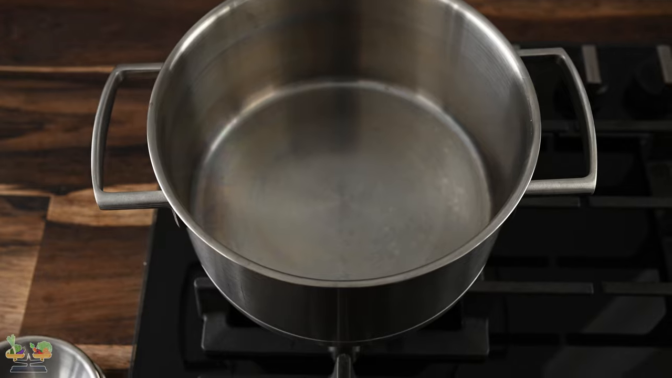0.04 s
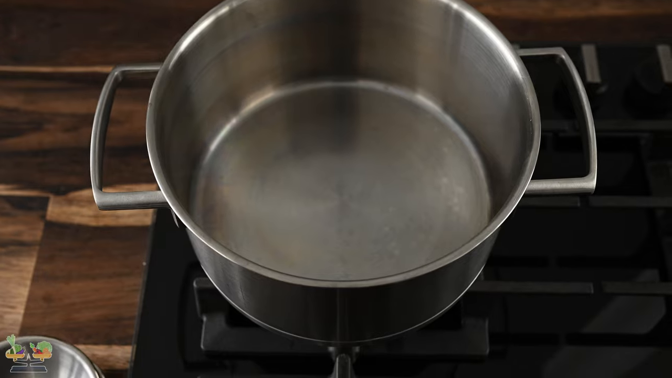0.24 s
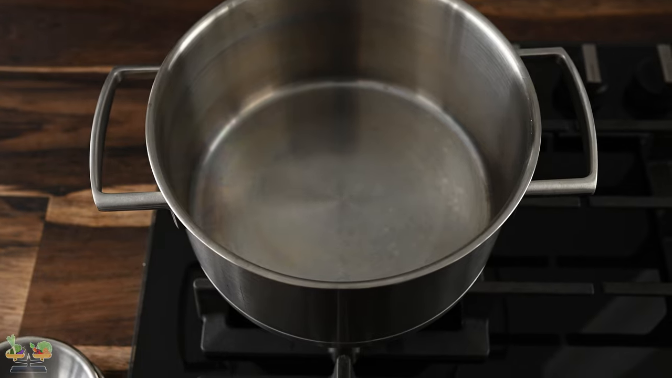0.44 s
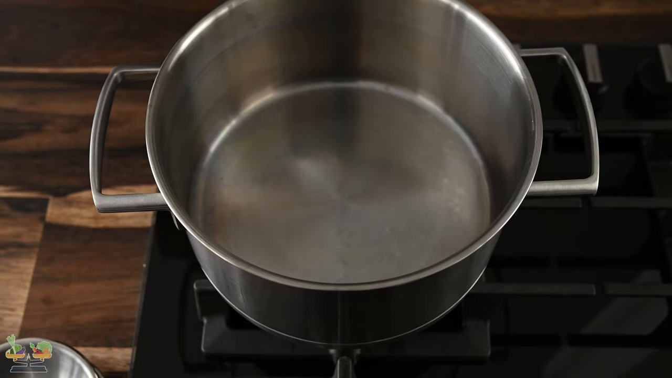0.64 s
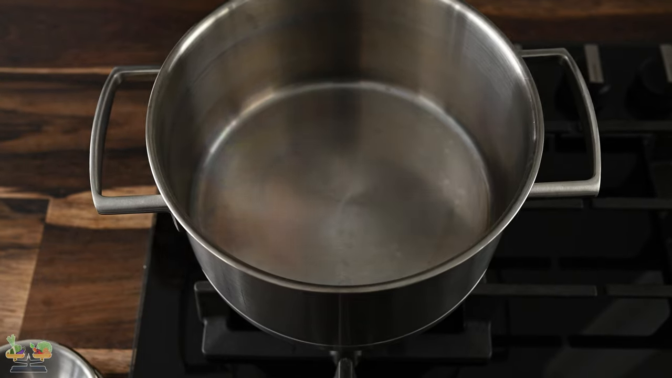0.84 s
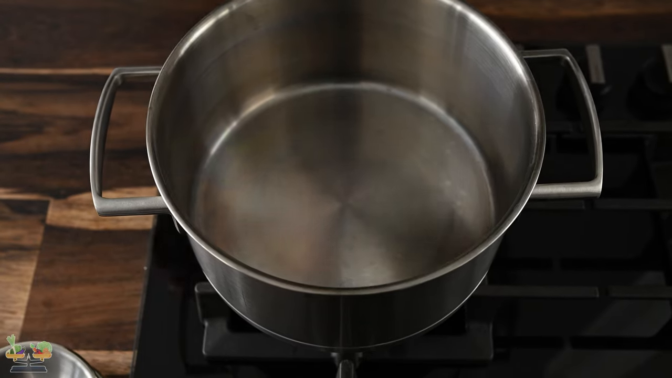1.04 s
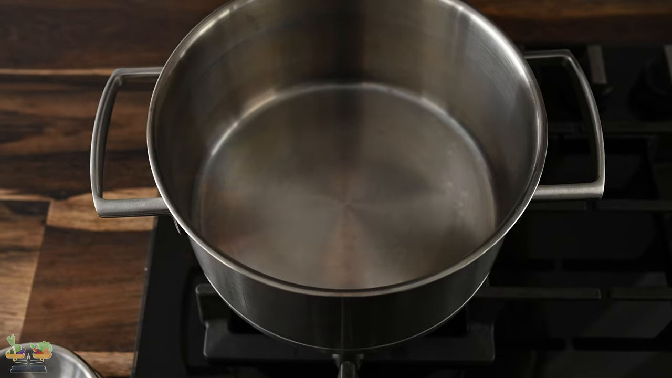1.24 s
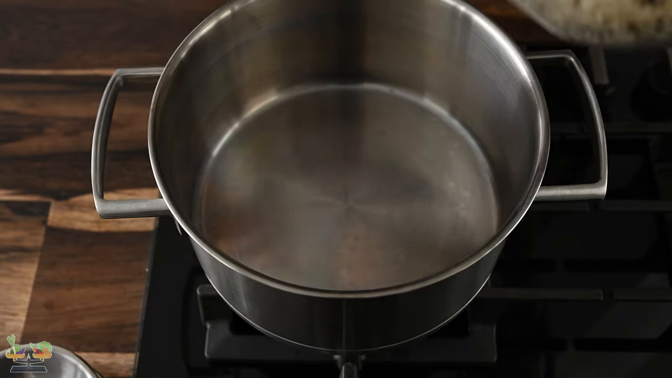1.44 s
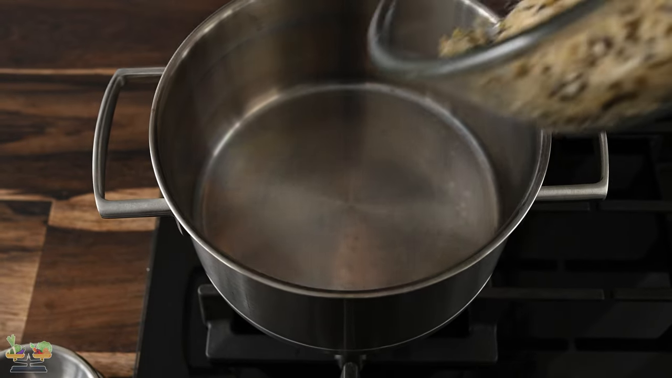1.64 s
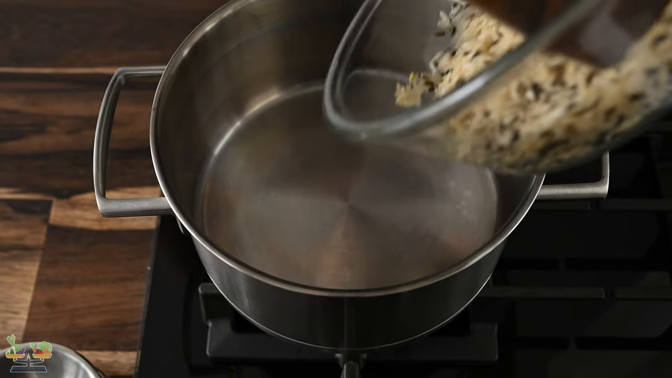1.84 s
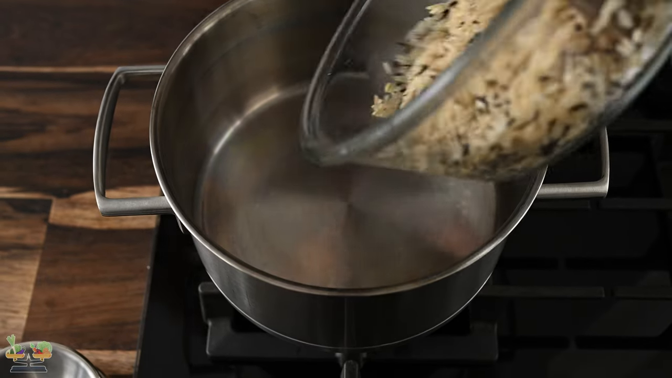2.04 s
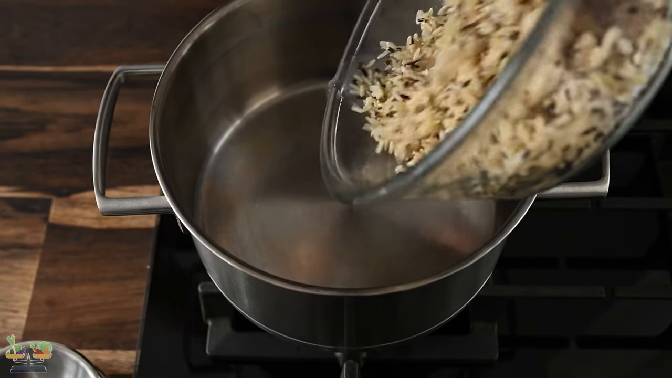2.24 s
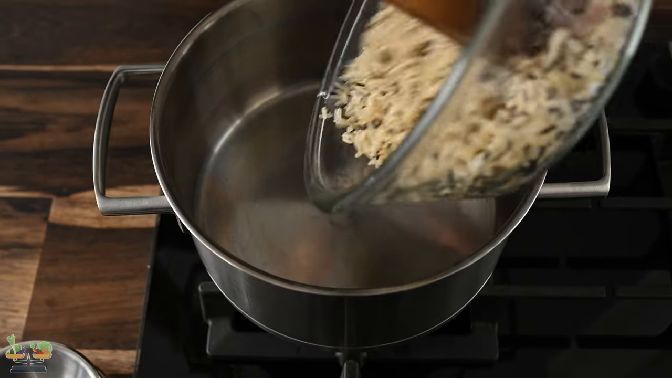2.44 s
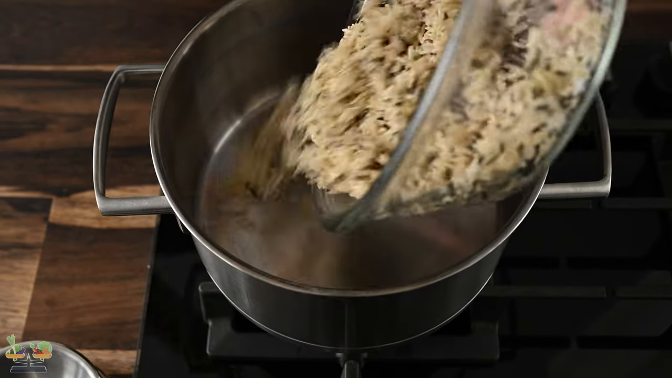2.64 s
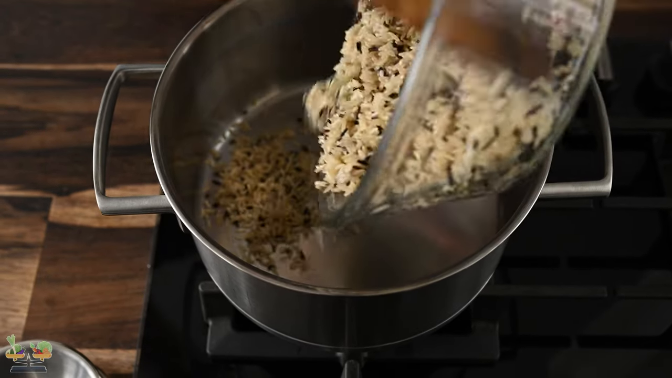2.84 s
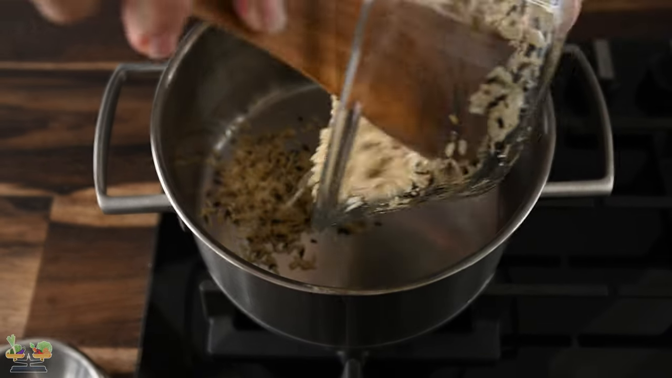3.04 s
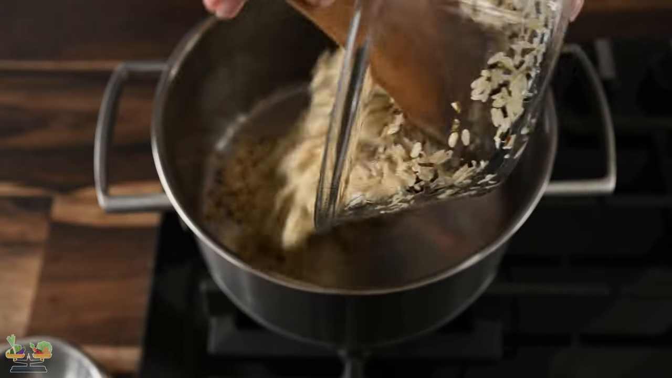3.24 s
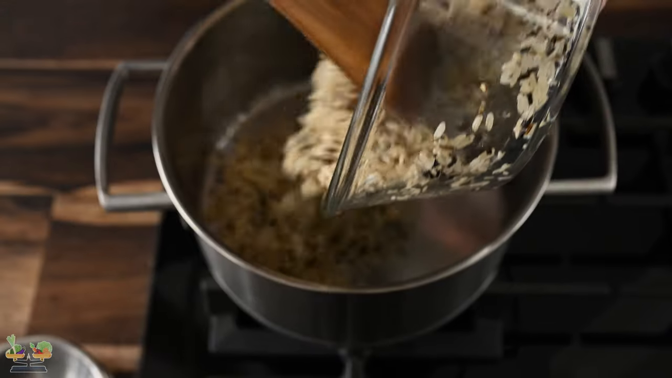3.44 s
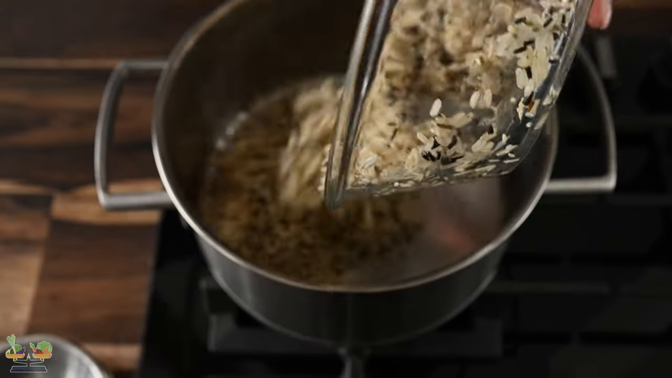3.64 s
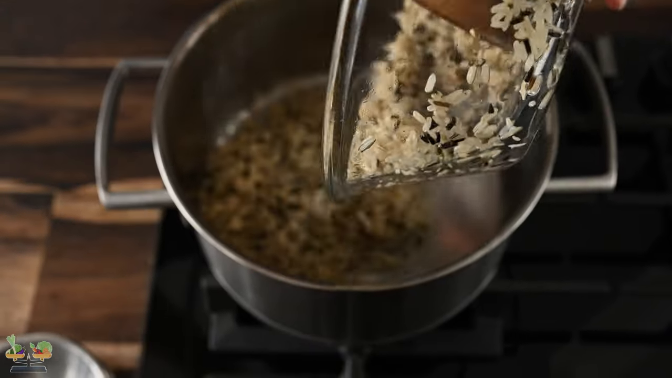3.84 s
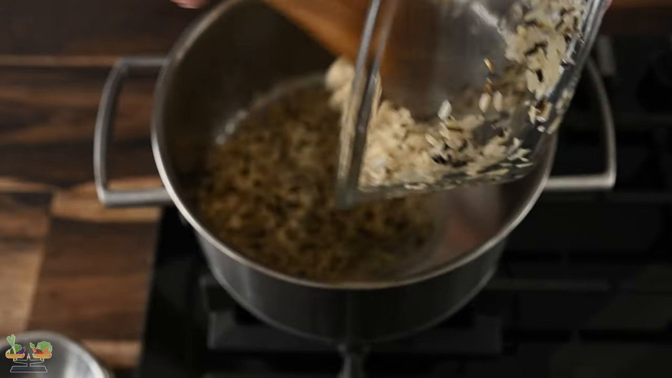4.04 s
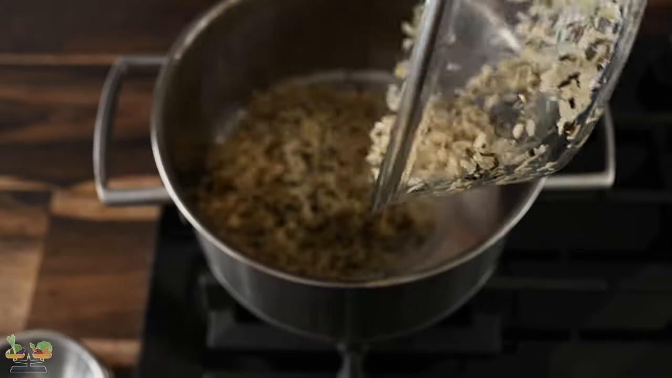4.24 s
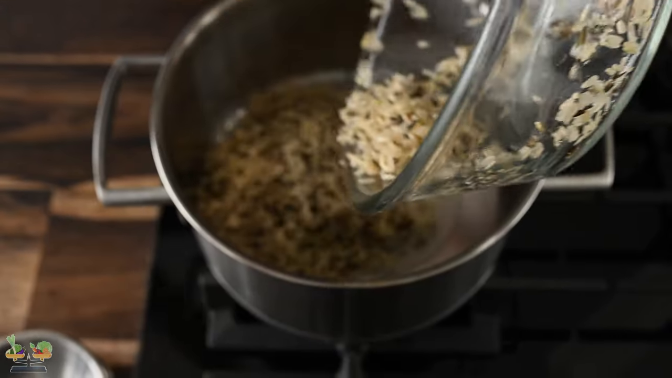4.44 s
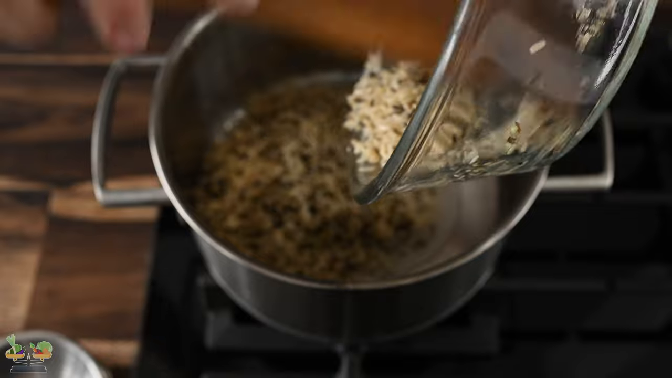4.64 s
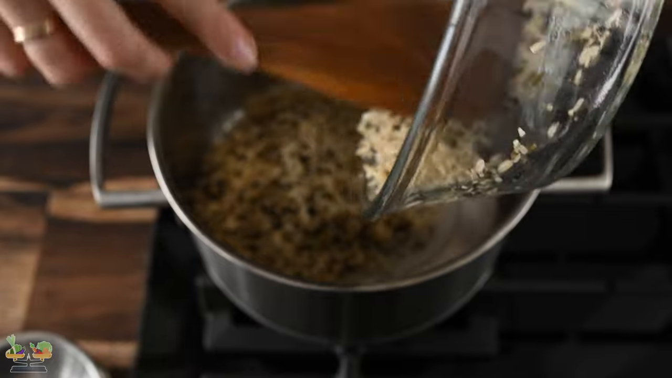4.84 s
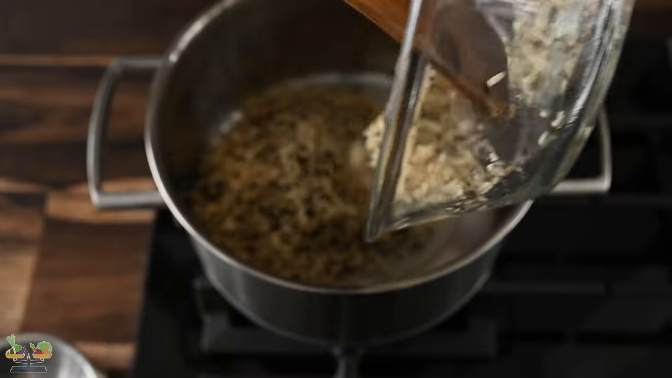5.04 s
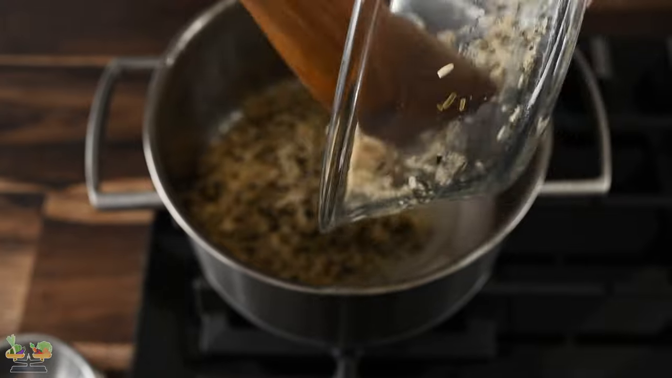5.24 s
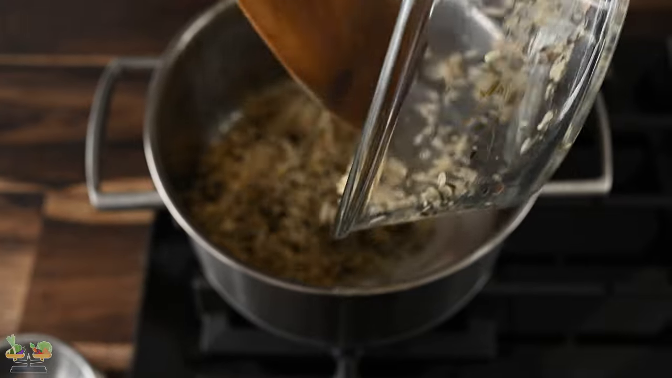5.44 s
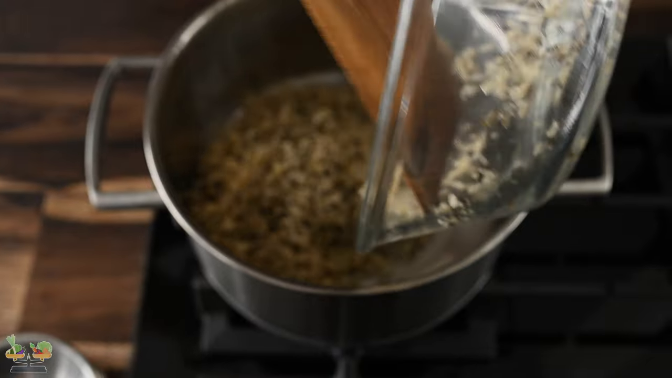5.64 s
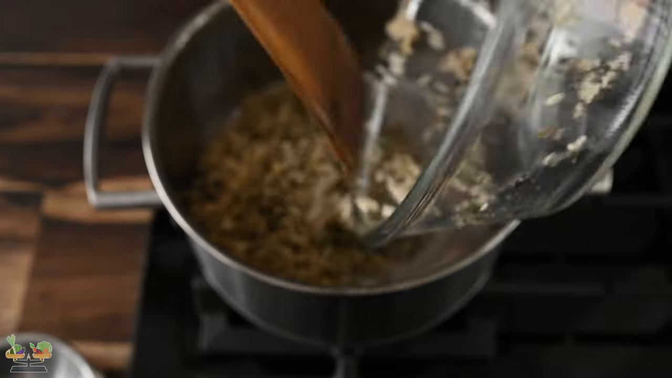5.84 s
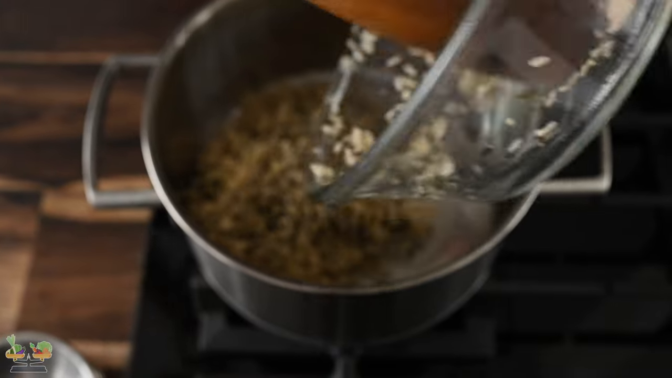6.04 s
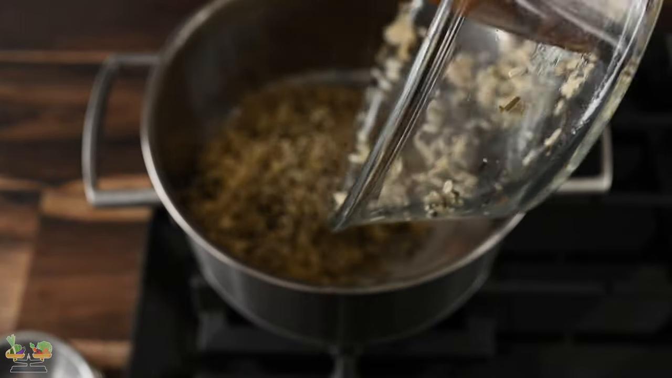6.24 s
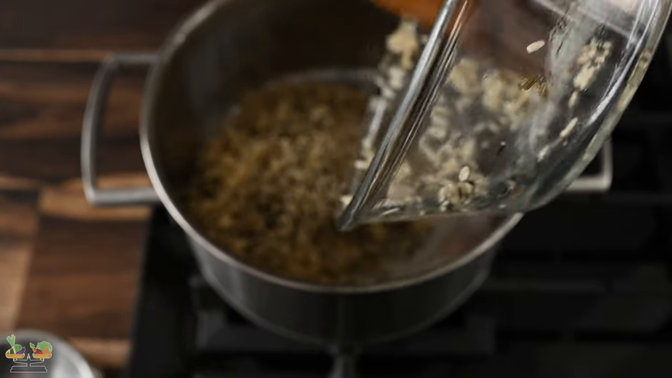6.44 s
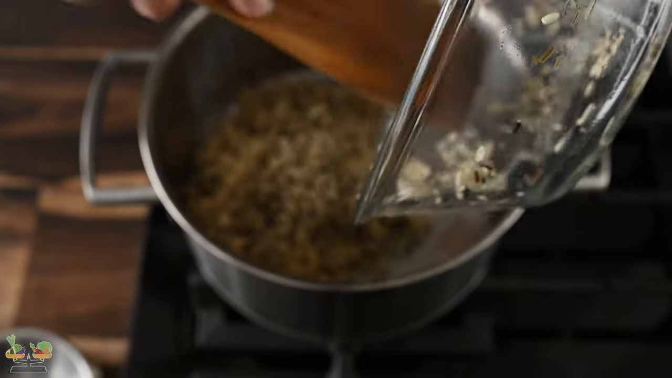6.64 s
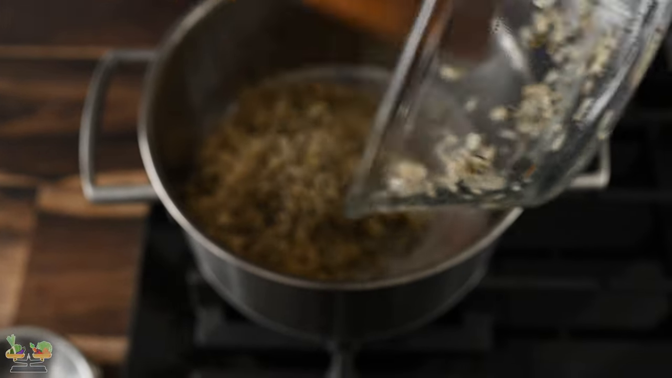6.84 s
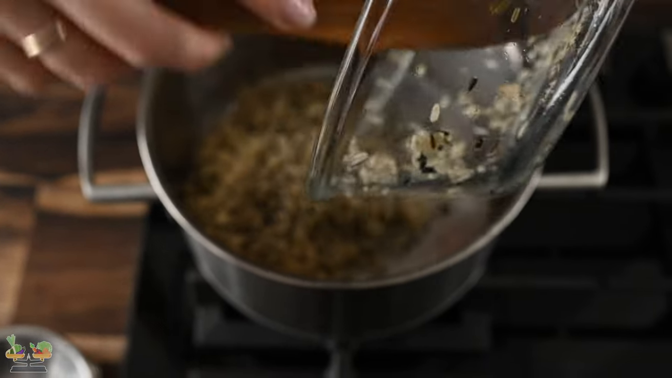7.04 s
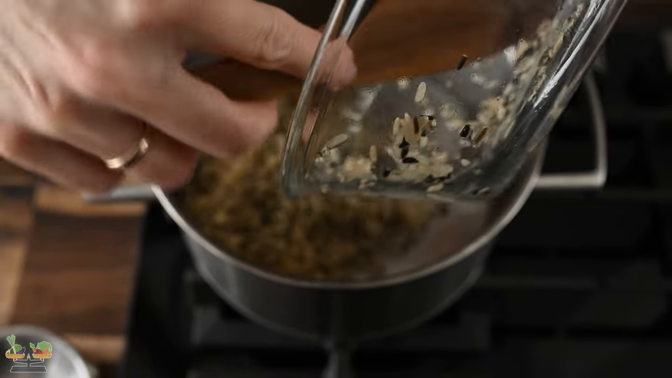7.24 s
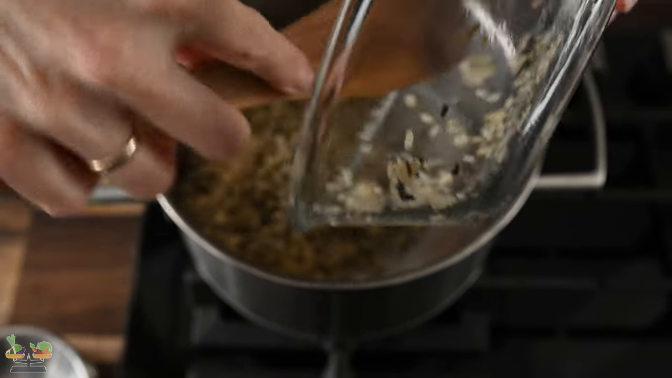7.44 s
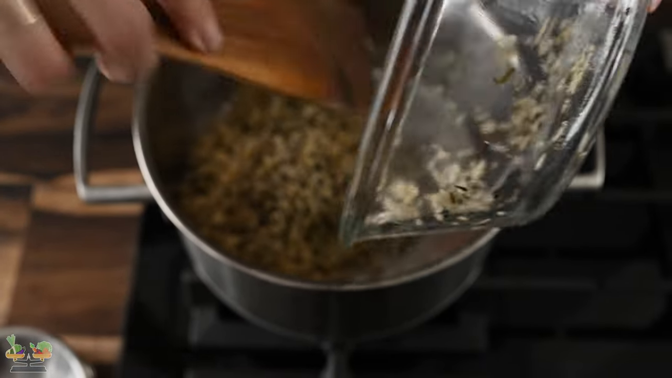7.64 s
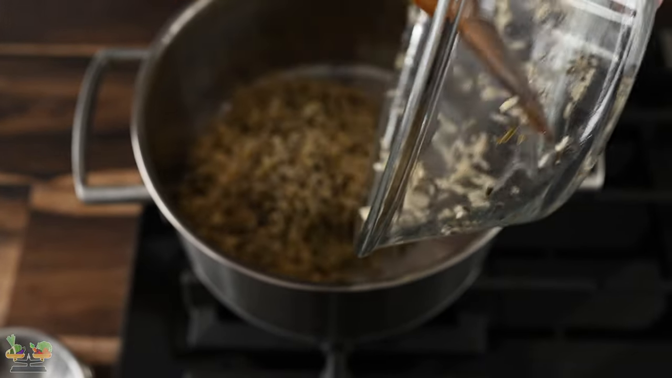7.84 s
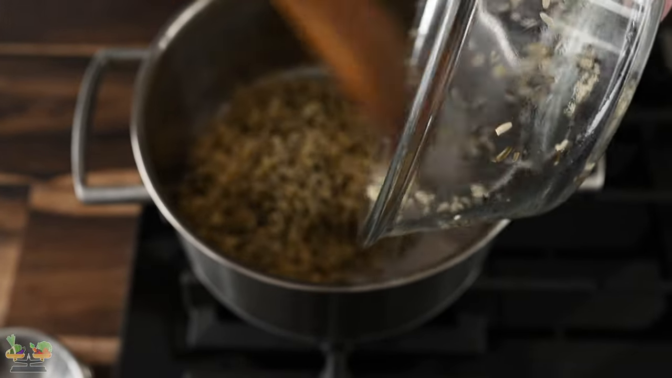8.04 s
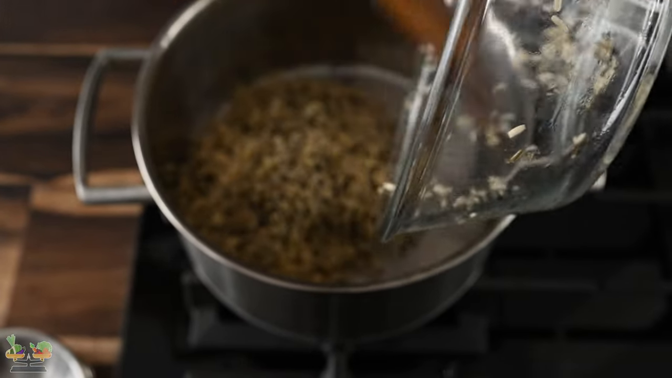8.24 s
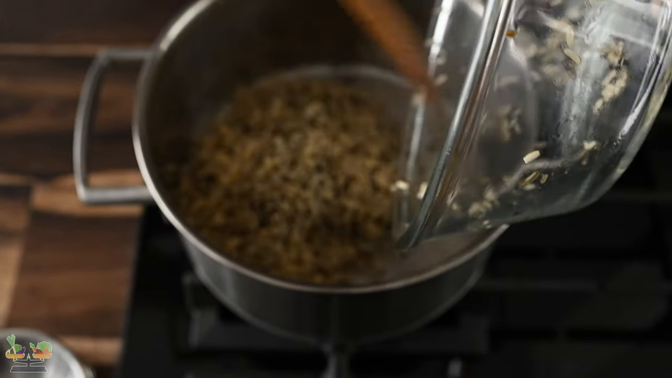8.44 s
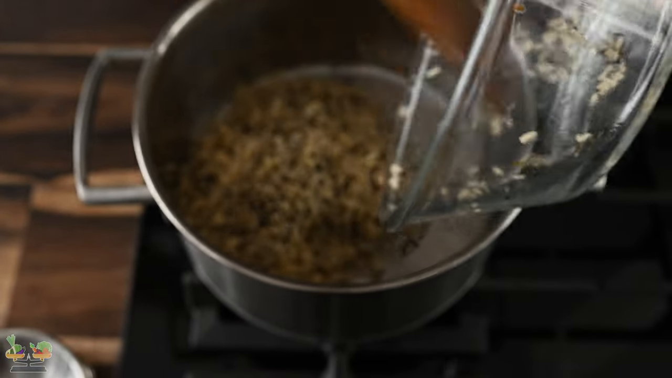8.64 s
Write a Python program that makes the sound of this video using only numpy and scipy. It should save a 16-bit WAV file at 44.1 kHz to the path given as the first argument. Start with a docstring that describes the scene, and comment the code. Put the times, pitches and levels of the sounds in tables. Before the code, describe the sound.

Damp rice is scraped from a glass bowl into a steel pot in hissing, rattling batches, with a wooden spatula knocking and one brief squeak.

```python
"""A quiet kitchen: room tone and a few dull bumps come first, then a wooden spatula knocks on a glass bowl.
Damp rice is scraped along the bowl and from 2.7 s tipped in batches into a steel pot, where a heap grows.
Grains tick on glass, steel and heap as random impacts that ring damped modes or snap as noise.
A short low hum follows at 5.5 s and one squeak of the spatula, a tone with two overtones, at 7.6 s."""
import sys
import numpy as np
from scipy import signal
from scipy.fft import irfft
from scipy.io import wavfile
from scipy.ndimage import uniform_filter1d

SR = 44100
rng = np.random.default_rng(int(sys.argv[2]) if len(sys.argv) > 2 else 0)


def output_pcm(signal):
    """Save a mono or channel-first signal as 16-bit PCM at the path in sys.argv[1].

    Samples are clipped to [-1, 1] before scaling.
    """
    pcm = np.clip(np.atleast_2d(signal).T, -1, 1) * 32767
    wavfile.write(sys.argv[1], SR, np.round(pcm).astype(np.int16))


N = 384111
TIME = np.arange(N) / SR  # s
POT_START_S = 2.68  # rice first reaches the pot

# Vibration modes of the glass bowl. Each row: frequency in Hz, relative level in dB, t60 in seconds.
GLASS_MODES = [(850.6, 1.5, 0.09), (1960, -1, 0.135), (3340, -6, 0.05), (5120, -4, 0.04), (7165, -11, 0.04),
               (9500, -19, 0.035), (12200, -17, 0.04)]
# Vibration modes of the wooden spatula. Each row: frequency in Hz, relative level in dB, t60 in seconds.
WOOD_MODES = [(563, -18.5, 0.017), (813, 2.5, 0.031), (950, -0.5, 0.015), (1508, 0, 0.027),
              (1777, 4.5, 0.0055), (2380, 13, 0.01), (2570, 9.5, 0.0048)]
# Vibration modes of the steel pot. Each row: frequency in Hz, relative level in dB, t60 in seconds.
STEEL_MODES = [(625, -18, 0.16), (1120, -9, 0.06), (1192, -10, .08), (2442, -9, 0.075), (2522, -8, 0.095),
               (3770, -13, 0.075), (3896, -10, 0.095), (4062, -11, 0.075), (4906, -11, 0.11),
               (5560, -12, 0.04), (5945, -7, 0.05), (7390, -7, 0.02), (7735, -6, 0.03), (8140, -8, 0.06),
               (8350, -8, 0.06), (8610, -4, 0.035), (9930, 0.5, 0.005), (14500, -1, 0.0035)]


def gain_of(db):
    """Level law: decibels to an amplitude factor."""
    return 10 ** (np.asarray(db) / 20)


def decay(t, t60):
    """Exponential damping: the level falls by 60 dB in t60 seconds."""
    return gain_of(-60 * t / t60)


def unit(x):
    """Energy normalization: scales a response to energy 1."""
    return x / np.linalg.norm(x, axis=-1, keepdims=True)


def filtered(x, order, hz, kind):
    """Linear filtering: a Butterworth filter with its corner or band edges in Hz."""
    return signal.lfilter(*signal.butter(order, hz, kind, fs=SR), x)


def read(points, hz):
    """Interpolation of a spectrum along a log-frequency axis."""
    point_hz, value = np.transpose(points)
    return np.interp(np.log(hz + 1), np.log(point_hz + 1), value)


def add(mix, s, sound):
    """Superposition: adds a sound to the mix in place, from s seconds on."""
    part = mix[..., round(s * SR):][..., :sound.shape[-1]]
    part += sound[..., :part.shape[-1]]


def ring(modes, spot_db, shift=0, pitch=1):
    """Modal response to a tap: the spot hit favours some damped modes by chance, the grip shifts them."""
    hz, db, t60 = np.transpose(modes)[:, :, None]
    spot, side, grip = rng.standard_normal((3, len(modes), 1))
    t = TIME[:SR // 7]
    waves = np.sin(2 * np.pi * hz * pitch * (1 + shift * grip) * t)
    level = gain_of(db + spot_db * spot) * decay(t, t60)
    return unit((np.sign(side) * level * waves).sum(0))


def tick():
    """Brief contact: a light grain touches glass so briefly that the upper modes stand out."""
    return unit(filtered(ring(GLASS_MODES[1:], 4), 3, 4300, "high"))


def snap(t60):
    """Overdamped impact: a dying puff of noise with the colour of rice on rice."""
    # Spectrum of rice on rice. Each row: frequency in Hz, relative level in dB per Hz.
    heap_spectrum = [(500, -32), (1500, -12), (3000, -6.5), (6000, 4.5), (9000, -5), (13000, -1.5),
                     (16000, -20)]
    puff = rng.standard_normal(1024) * decay(TIME[:1024], t60)
    colour = irfft(gain_of(read(heap_spectrum, np.fft.rfftfreq(1024, 1 / SR))))
    return unit(np.convolve(puff, np.roll(colour, 32)[:64] * np.hanning(64)))


def patter(level, per_s, spread_db, responses):
    """Poisson impacts: taps of uneven size at random moments and places; the rms follows level."""
    size = gain_of(spread_db * np.minimum(rng.exponential(1, N), 4))
    hit = rng.random(N) < per_s / SR
    expected_power = np.mean(size ** 2) * per_s / SR
    train = level * size * hit / np.sqrt(expected_power)
    out = np.zeros((2, N))
    kind = rng.integers(0, len(responses), N)
    for k, response in enumerate(responses):
        # each response has a place of its own, from left to right
        place = np.pi / 4 + 0.44 * np.cos(np.pi * k / (len(responses) - 1))
        pan = np.sqrt(2) * np.array([[np.sin(place)], [np.cos(place)]])
        out += pan * signal.oaconvolve(train * (kind == k), response)[:N]
    return out


def air():
    """Stationary noise: room tone and hiss, partly correlated between sides, swelling a little."""
    # Spectrum of the air. Each row: frequency in Hz, relative level in dB per Hz.
    air_spectrum = [(15, -45), (25, -23.5), (157, -8.5), (344, -5.5), (677, -12), (1330, -13),
                    (16000, -19.5)]
    level_db, same = -62, 0.6  # rms of both sides; correlation of the sides, 0-1
    frames, hz = N // 256 + 5, np.fft.rfftfreq(1024, 1 / SR)
    a, b, c, d, patches = rng.standard_normal((frames, 513, 5)).T
    # smoothed over frequency, then over time
    patches = uniform_filter1d(uniform_filter1d(patches, size=20, axis=0), size=14, axis=1)
    left = a + 1j * b
    right = same * left + np.sqrt(1 - same ** 2) * (c + 1j * d)
    swell_db = patches / patches.std()
    z = np.array([left, right]) * gain_of(read(air_spectrum, hz)[:, None] + swell_db)
    tone = signal.istft(z, nperseg=1024, noverlap=768)[1][:, :N]
    return gain_of(level_db) * tone / tone.std()


def kitchen(x):
    """Reverberation: sparse echoes of random sign, each band dying at its own speed, partly shared by sides."""
    # Reverberation time. Each row: frequency in Hz, t60 in seconds.
    room_t60 = [(200, 0.32), (800, 0.29), (2500, 0.25), (14000, 0.27)]
    taps = np.zeros((3, SR // 2))  # left, right, shared
    at = np.arange(120, SR // 2 - 20, 20)  # samples: one echo in every 20
    at = at + rng.integers(0, 20, (3, len(at)))
    np.put_along_axis(taps, at, rng.choice([-1., 1.], at.shape), 1)
    hz, t, z = signal.stft(taps[:2] + 0.59 * taps[2], SR, nperseg=256)
    tail = signal.istft(z * decay(t, read(room_t60, hz)[:, None]), SR, nperseg=256)[1]
    return signal.fftconvolve(x, unit(tail), axes=1)[:, :N]


def bumps():
    """Band-limited noise bursts: dull steps, bumps, low knocks and a rub; a deeper boom swells up behind each."""
    # Each row: start in seconds, peak level in dB, top frequency in Hz, t60 in seconds.
    bump_rows = [(0.309, -49.5, 478, 0.37), (0.568, -43, 910, 0.15), (0.968, -51, 377, 0.28),
                 (1.59, -48, 690, .21), (1.799, -26.5, 300, 0.03), (1.978, -51, 400, 0.032),
                 (2.714, -41.5, 500, 0.029), (4.683, -58, 129.3, 0.1), (4.959, -38, 900, 0.018),
                 (5.297, -43, 880, 0.022), (5.354, -38, 980, .05), (5.438, -42.5, 570, 0.17)]
    out, t = np.zeros(N), TIME[:SR // 4]
    for s, db, top_hz, t60 in bump_rows:
        noise = rng.standard_normal(len(t))
        knock = filtered(noise, 1, [0.43 * top_hz, top_hz], "band")
        boom = filtered(noise, 2, [80, 190], "band")
        knock *= 1 - np.exp(-t / 0.0016)
        boom *= 3.2 * np.minimum(t / 0.057, 1) ** 2
        burst = (knock + boom) * decay(t, t60)
        add(out, s, gain_of(db) * burst / abs(burst).max())
    return out


def hum():
    """Pure tone under a half-sine envelope: a soft low hum swells and dies within thirteen cycles."""
    start_s, length_s, hz, peak_db = 5.462, 0.048, 265, -44
    out, t = np.zeros(N), np.arange(0, length_s, 1 / SR)
    swell = np.sin(np.pi * t / length_s)
    add(out, start_s, gain_of(peak_db) * swell * np.sin(2 * np.pi * hz * t))
    return out


def squeak():
    """Stick-slip: regular slips build up to a harmonic tone, then the edge lets go."""
    # Harmonics. Each row: multiple of the fundamental, relative level in dB.
    harmonics = [(1, -4), (2, -10), (3, -30)]
    pitch_hz, full_s, hold_s, level_db = 1213, 7.563, 0.012, -20.5
    rise, fall = 1360, 6600  # dB per s
    tone = sum(gain_of(db) * np.sin(2 * np.pi * k * pitch_hz * TIME) for k, db in harmonics)
    t = TIME - full_s
    down_db = rise * np.maximum(-t, 0) + fall * np.maximum(t - hold_s, 0)
    return np.sqrt(2) * gain_of(level_db - np.minimum(down_db, 200)) * tone


def drops():
    """Single impacts: each loose grain snaps and rings the bowl at first, later the wall of the pot."""
    # Each row: start in seconds, peak level in dB.
    drop_rows = [(2.205, -35), (2.2608, -34.5), (2.427, -42), (2.5724, -31), (4.0434, -28.5),
                 (4.2987, -28.5), (5.145, -42), (5.223, -29.5), (5.251, -32), (5.325, -36.5), (5.37, -30),
                 (5.417, -41), (5.529, -35.5), (6.048, -30), (6.255, -39.5), (6.4873, -38), (7.246, -38.5),
                 (7.7086, -30), (8.0534, -32.5), (8.115, -26), (8.471, -33.5), (8.6, -32.5), (8.684, -39.5)]
    out = np.zeros(N)
    for s, db in drop_rows:
        sound = ring(STEEL_MODES[5:], 11.0, 0.055) if s > POT_START_S else tick()
        add(sound, 0, 0.93 * snap(0.034))
        add(out, s, gain_of(db) * sound / abs(sound).max())
    return out


def knocks():
    """Impact spectrum: a force pulse rings bowl and rebounding wood, duller if longer; edge cracks, hand thuds."""
    # Spatula on glass. Each row: start in seconds, peak level of the wood in dB before the high-pass,
    # crack and ring of the bowl in dB relative to that peak, contact in ms (limited to 0.1-3 for the force),
    # pitch factor of the wood as gripped (1 = loose).
    knock_rows = [(1.8, -25.5, 7.5, 4.5, 0.068, 1.2), (2.787, -21.5, -23, -24, 3.2, 0.84),
                  (2.844, -26, -15, -27, 1.14, 1.1), (3.724, -20, -24, -27, 1.16, 1.01),
                  (3.878, -21.5, -10, -1, 2.3, 0.98), (4.435, -17, -7.5, -15, 0.35, 1.01),
                  (4.516, -19.5, -17, -25, 2.3, 0.85), (5.134, -9.5, -16.5, -7, 0.27, 0.95),
                  (5.6, -21, 4, -4.5, 0.43, 0.95), (5.843, -19.5, -33, 1, 0.91, 1.01),
                  (5.912, -11.5, -19.5, -14.5, 0.8, 0.98), (6.142, -6, -18.5, -16, 0.25, .8),
                  (6.144, -4, -14, -16, 0.14, 1.02), (6.452, -13.5, -7.5, -8.5, 0.66, 0.97),
                  (6.664, -25.5, 3, -31, 0.59, 0.97), (6.791, -22, -21, -3.5, 1.35, 0.92),
                  (6.993, -14, -5, -4, 0.26, 0.85), (7.005, -11.5, -8.5, -33, 0.52, 1.044),
                  (7.18, -29, -20, -9, 0.74, 0.83), (7.301, -20, -14.5, -15.5, 0.77, 1.04),
                  (7.592, -21.5, -26, -11, 0.89, 0.89), (7.917, -9, -7.5, -23.5, 0.51, 1.06),
                  (7.998, -20.5, -13.5, -2, 1.4, 0.98), (8.135, -17.5, -4, 2.5, 0.68, 0.966),
                  (8.362, -11, -22.5, 1, 0.35, 0.96), (8.482, -22.5, -28, 7.5, 0.72, 1.6)]
    flat_thud_db = 14  # per ms of contact up to 1 ms: a flat, slow blow thuds more
    out, thuds, spot_db = np.zeros(N), np.zeros(N), 2
    for s, db, crack_db, glass_db, contact_ms, pitch in knock_rows:
        u = TIME[:800] / (np.clip(contact_ms, .1, 3) / 1000)
        force = u ** 2 * np.exp(-5.0 * u)
        rebound = 1.2 * np.roll(force, int(rng.uniform(0.001587, 0.003496) * SR))
        wood = signal.oaconvolve(ring(WOOD_MODES, spot_db, 0.028, pitch), force + rebound)
        glass = signal.oaconvolve(ring(GLASS_MODES, spot_db, 0.00316), force)
        crack_and_thud_t60 = np.array([[.018], [.05]])
        crack, thud = rng.standard_normal((2, 3000)) * decay(TIME[:3000], crack_and_thud_t60)
        crack = filtered(crack, 1, [2500, 4200], "band")
        add(out, s, gain_of(db) * wood / abs(wood).max())
        add(out, s, gain_of(db + glass_db) * glass / abs(glass).max())
        add(out, s, gain_of(db + crack_db) * crack / abs(crack).max())
        add(thuds, s, gain_of(db - 17.5 + flat_thud_db * min(contact_ms, 1)) * thud)
    out = filtered(out, 3, 580, "high")  # small bodies radiate little bass
    return out + filtered(thuds, 2, [70, 420], "band")


def strokes():
    """Shared envelope: powers of the rustle on rice, the ticks on glass and the scraping edge swell together."""
    # Rice pushed along the bowl. Each row: start in seconds, length in seconds, rustle level in dB,
    # scraping level in dB, share of the rustle's power that ticks on glass (0-1).
    stroke_rows = [(1.91, 0.18, -50, -59, 0.07), (2.179, 0.2, -54, -65.5, 0.7),
                   (2.407, 0.27, -56.5, -66, 0.85), (2.692, 0.56, -53, -56, 0),
                   (3.233, 0.85, -56.5, -52.5, 0.03), (4.061, 0.33, -50.5, -58, 0.15),
                   (4.598, 0.36, -53, -56, 0.28), (5.127, 0.31, -53.5, -57, 0),
                   (5.38, 0.37, -55, -68.5, 0.2), (5.763, 0.11, -52.5, -52, 0.36),
                   (6.139, 0.23, -62, -58.5, 0.4), (6.558, 0.28, -54.5, -60.5, 0.26),
                   (7.292, 0.57, -61.5, -70, 0.33), (7.935, 0.44, -65, -57, 0.2),
                   (8.447, 0.14, -48, -49.5, 0.14)]
    late, full = 1.04, 0.86  # above 1 the peak comes past the middle; a smaller full is flatter
    out = np.zeros((3, N))
    for s, length, rustle_db, scrape_db, glass in stroke_rows:
        progress = np.arange(0, 1, 1 / (length * SR))
        swell = abs(np.sin(np.pi * progress ** late)) ** full
        rustle, scraping = gain_of(rustle_db) ** 2, gain_of(scrape_db) ** 2
        add(out, s, np.outer([rustle * (1 - glass), rustle * glass, scraping], swell))
    return out


def scrape():
    """Friction as random slips: the spatula edge rings the wood and the low modes of bowl and pot."""
    bodies = []
    for _ in range(6):
        wood = ring(WOOD_MODES, 3.1, .08)
        bowl = ring(GLASS_MODES[:2], 4.5)
        pot = ring(STEEL_MODES[:5], 1.3)
        bodies.append(unit(wood + 0.35 * bowl + 0.35 * pot))
    return patter(np.sqrt(strokes()[2]), 470, 2.3, bodies)


def spills():
    """Power sharing between steel and heap: each batch of rice lands at once, holds, then thins out."""
    # Batches landing in the pot. Each row: start in seconds, level in dB, hold in seconds,
    # fade in dB per second, share of the power on bare steel (0-1).
    spill_rows = [(2.679, -34, 0.13, 65.5, 0.71), (2.978, -43.5, 0.042, 300, 0.62),
                  (3.166, -46.5, 0.095, 157, 0.18), (3.264, -35.5, 0.06, 248, 0.6),
                  (3.38, -38, 0.038, 304, 0.8), (3.441, -45, 0.074, 144, 0.45),
                  (3.537, -40.5, 0.14, 250, 0.53), (3.713, -40.5, 0.029, 95.5, 0.54),
                  (3.943, -51, 0.02, 106, 0.4), (4.185, -47.5, 0.15, 287, 0.34),
                  (5.21, -48.5, 0.05, 400, 0.06), (5.958, -46, 0.013, 405, 0.86),
                  (6.42, -50, 0.069, 236, 0.12), (6.893, -43.5, 0.041, 489, 0.4),
                  (7.552, -43.5, 0.012, 304, 0.16), (8.074, -45.5, 0.058, 400, 0.01),
                  (8.238, -24, 0.012, 340, 0.7)]
    rise_s = .006
    out, t = np.zeros((2, N)), TIME[:SR]
    for s, db, hold, fade, steel in spill_rows:
        level = gain_of(db - fade * np.maximum(t - hold, 0)) * np.minimum(t / rise_s, 1)
        add(out, s, np.outer([steel, 1 - steel], level ** 2))
    return out


def rice():
    """Granular flow: louder is denser and comes in clumps; each surface takes its share of the power."""
    clumps = uniform_filter1d(uniform_filter1d(rng.standard_normal(N), size=500), size=300)
    clumps = gain_of(2.3 * clumps / clumps.std())
    power = np.vstack([spills(), strokes()[:2]])
    steel, heap, slide, glass = clumps * np.sqrt(power)
    flow = clumps * np.sqrt(power.sum(0))
    per_s = np.clip(3000 * (flow / gain_of(-33.0)) ** 0.9, 90, 9000)  # grains per second
    bare = np.clip(1 - (TIME - POT_START_S) / 3.3, .15, 1)  # the heap mutes the lower modes of the pot

    high_steel = [ring(STEEL_MODES[9:], 3, 0.0059) for _ in range(8)]
    middle_steel = [ring(STEEL_MODES[5:9], 3, .005) for _ in range(4)]
    low_steel = [ring(STEEL_MODES[:5], 3, .008) for _ in range(4)]
    glass_ticks = [tick() for _ in range(6)]
    heap_snaps = [snap(0.019) for _ in range(4)]
    slide_snaps = [snap(0.0021) for _ in range(4)]
    return (patter(steel, per_s, 6.2, high_steel)
            + patter(.5 * bare * steel, per_s, 4.5, middle_steel)
            + patter(0.45 * bare * steel, per_s, 1.8, low_steel)
            + patter(glass, 0.32 * per_s, 3, glass_ticks)
            + patter(heap, 0.35 * per_s, 3.73, heap_snaps)
            + patter(slide, 1.5 * per_s, 3.2, slide_snaps))


def scene():
    """Direct-to-reverberant ratio: dull bumps, distant steps and closer low knocks alike, get more kitchen."""
    clear = rice() + scrape() + knocks() + drops() + squeak() + hum()
    dull = bumps()[None]
    return clear + gain_of(-8.0) * kitchen(clear) + dull + 1.04 * kitchen(dull) + air()


def record(dry):
    """Band limitation: a linear-phase low-pass ends the spectrum near 15.85 kHz."""
    edge_hz = 15850
    lowpass = signal.firwin(511, edge_hz, window=("kaiser", 9), fs=SR)
    return signal.oaconvolve(dry, lowpass[None], "same")


dry = scene()
out = record(dry)
output_pcm(out)
```